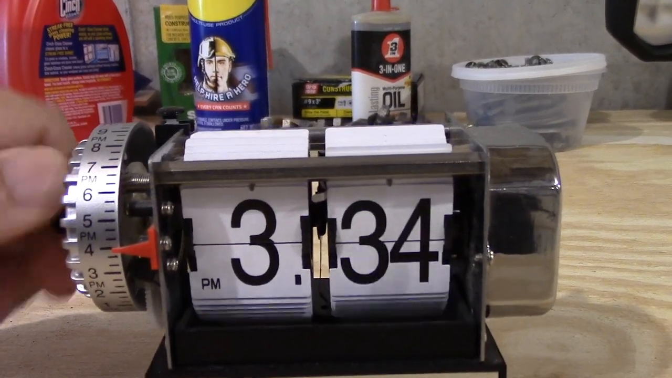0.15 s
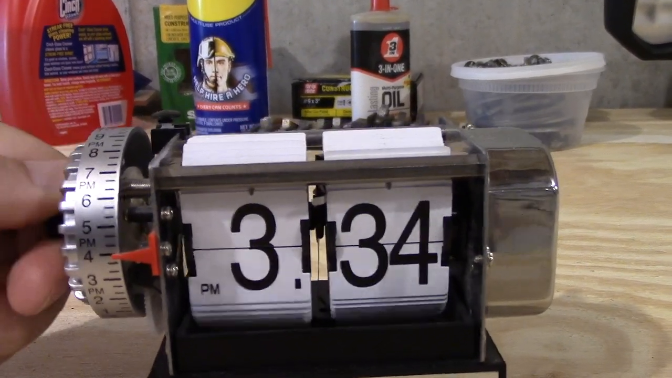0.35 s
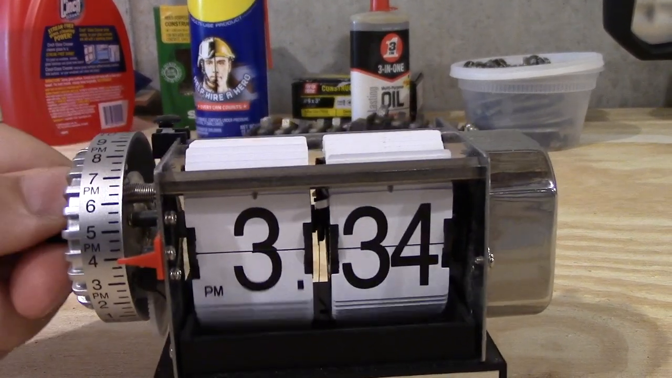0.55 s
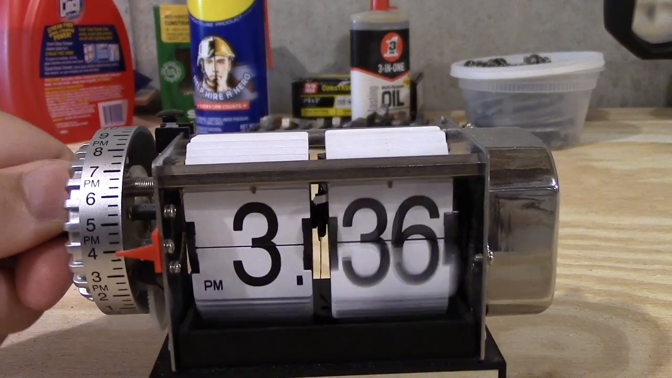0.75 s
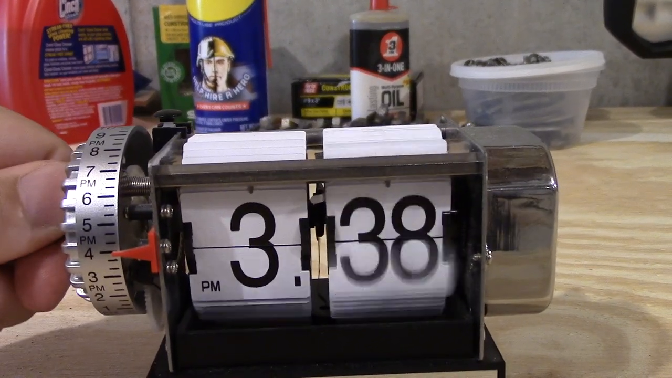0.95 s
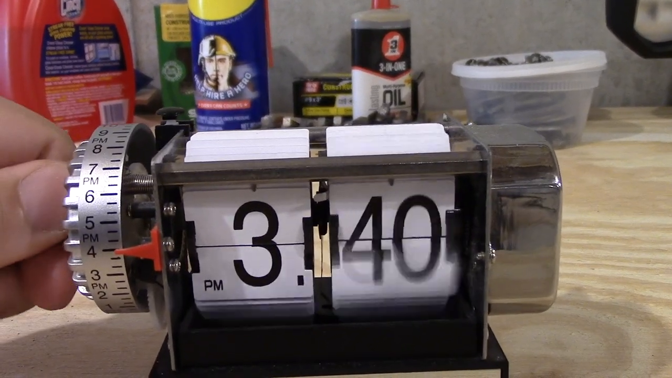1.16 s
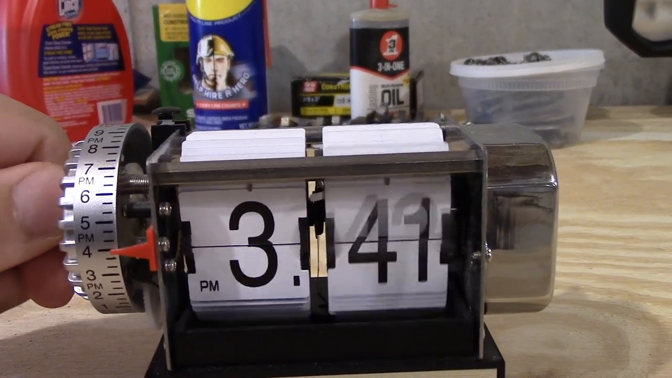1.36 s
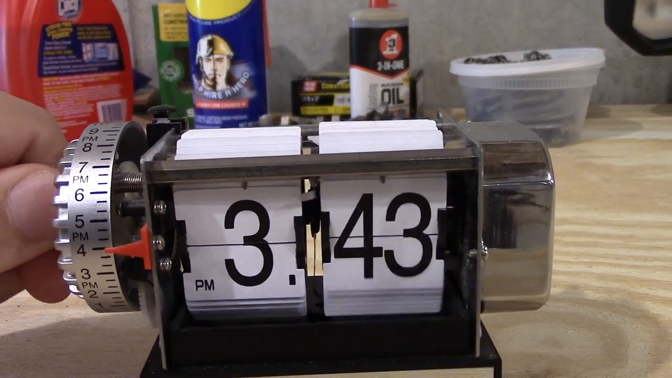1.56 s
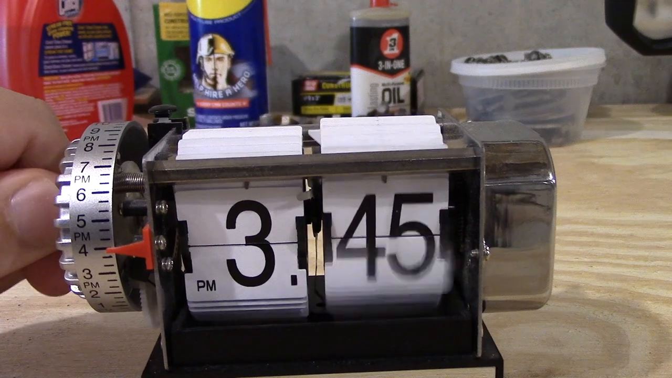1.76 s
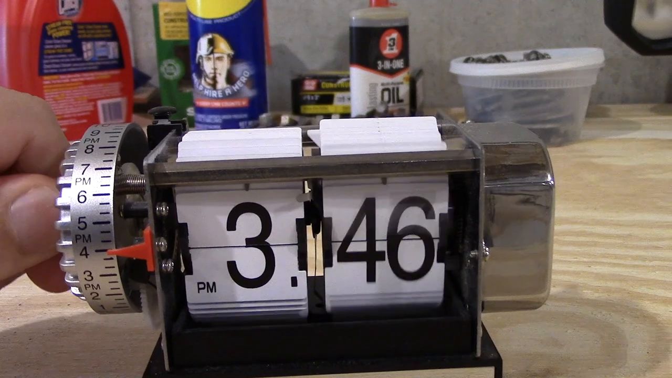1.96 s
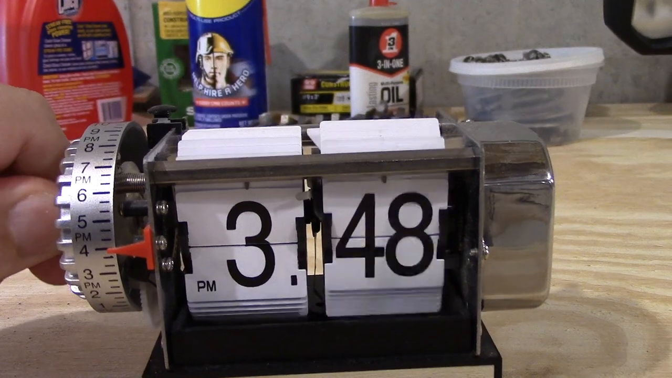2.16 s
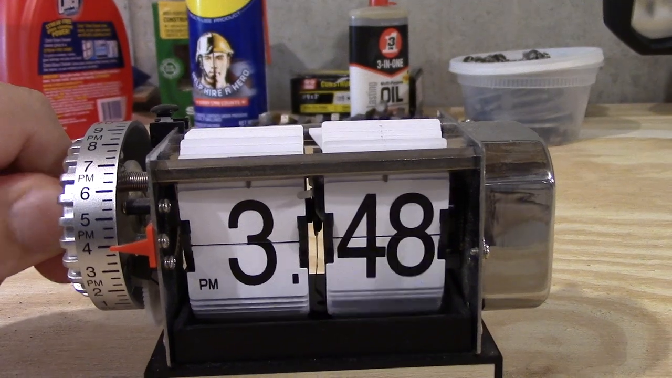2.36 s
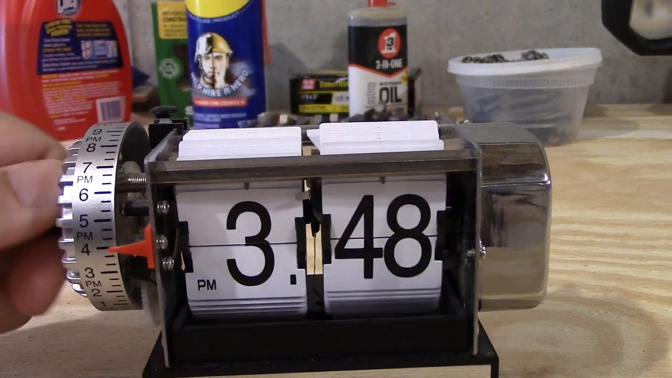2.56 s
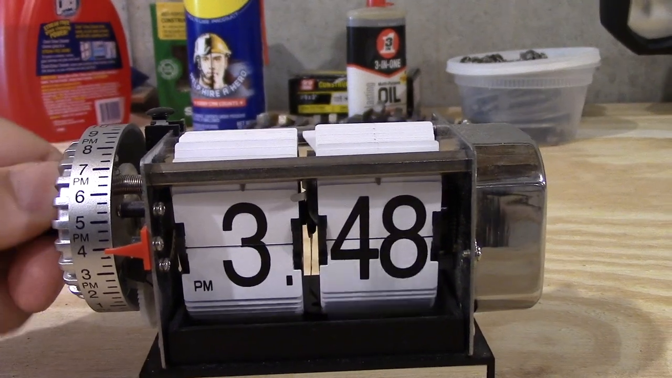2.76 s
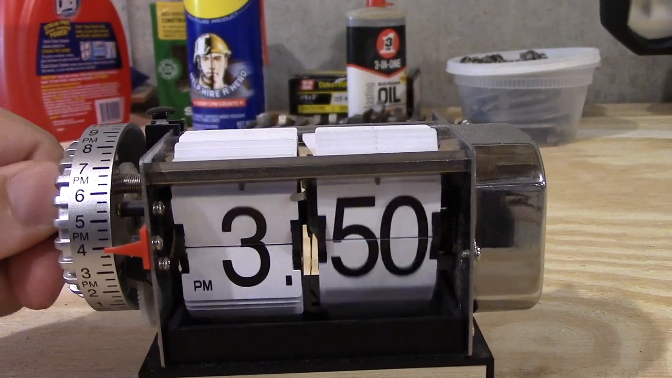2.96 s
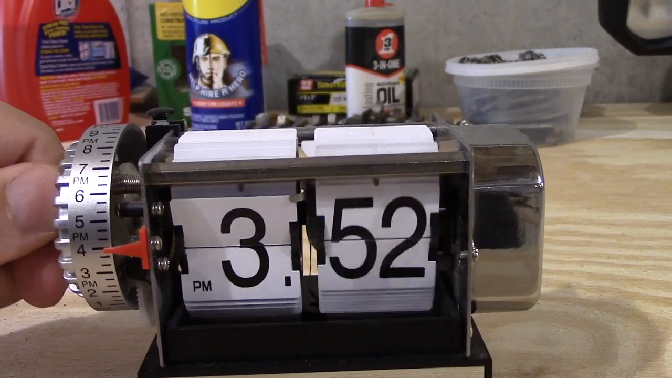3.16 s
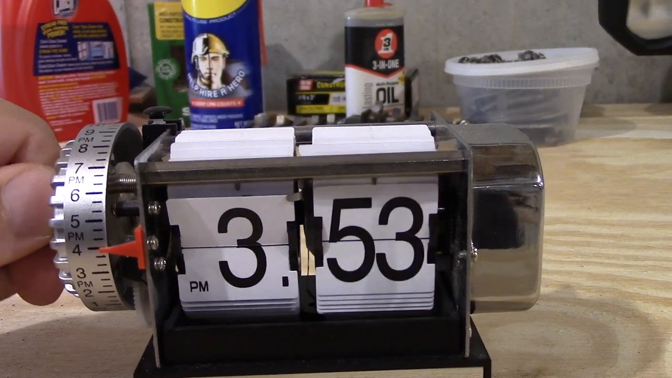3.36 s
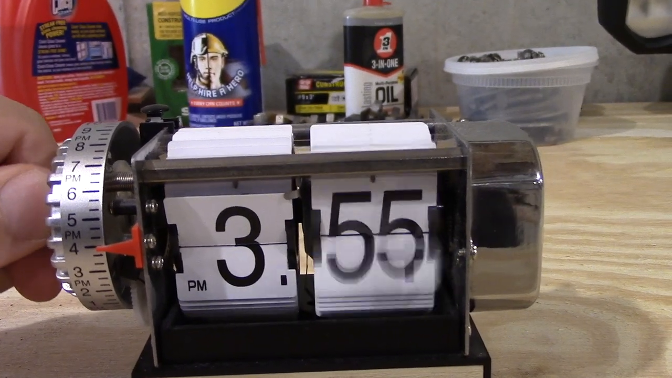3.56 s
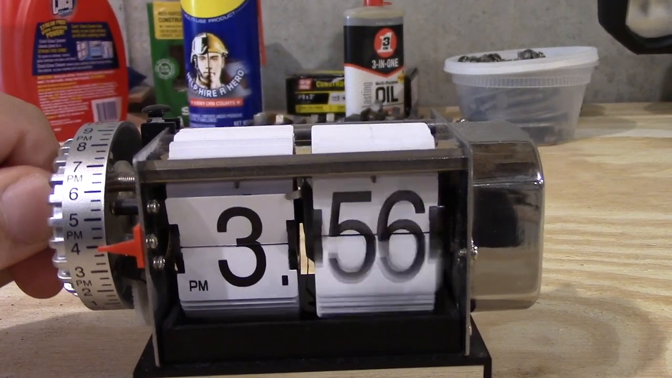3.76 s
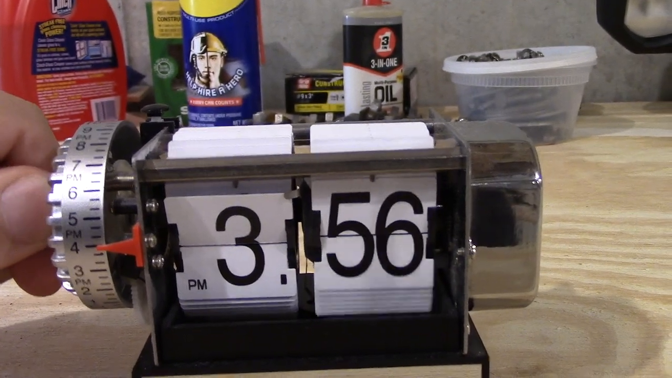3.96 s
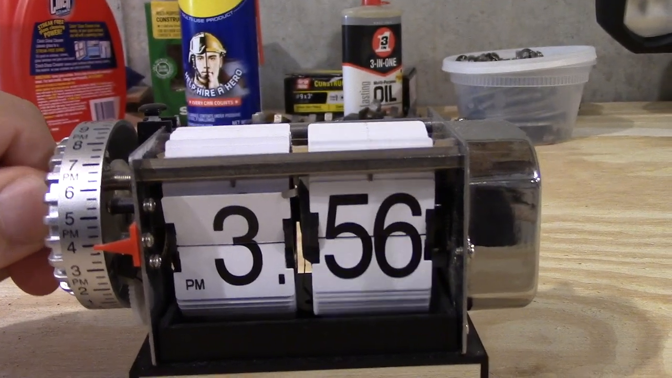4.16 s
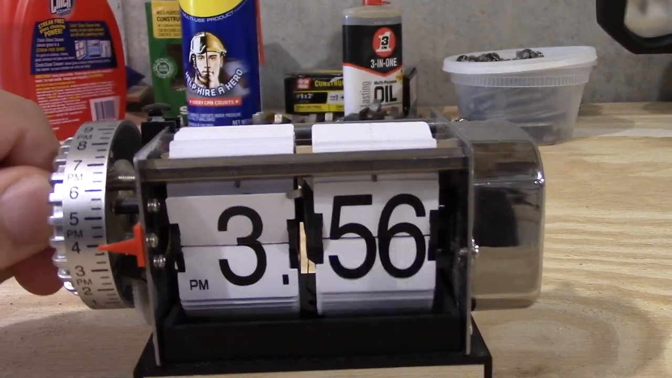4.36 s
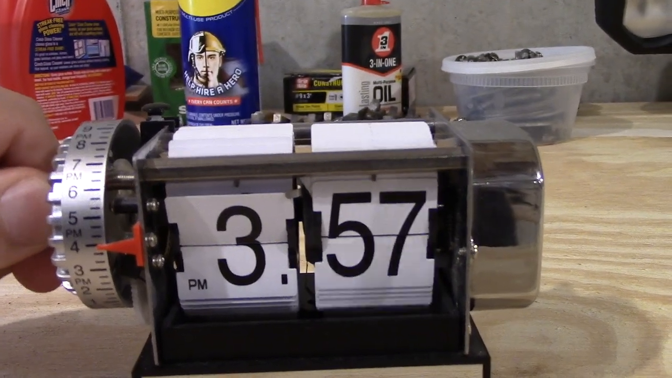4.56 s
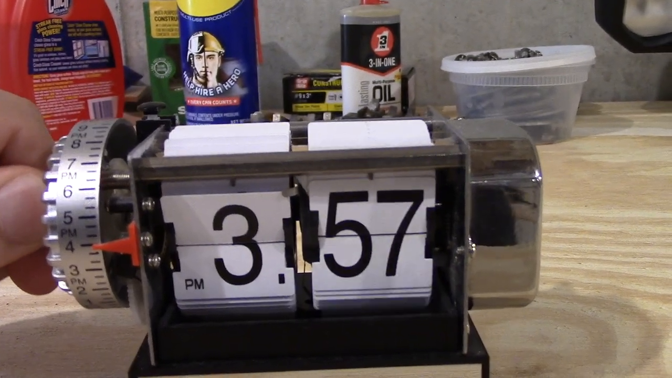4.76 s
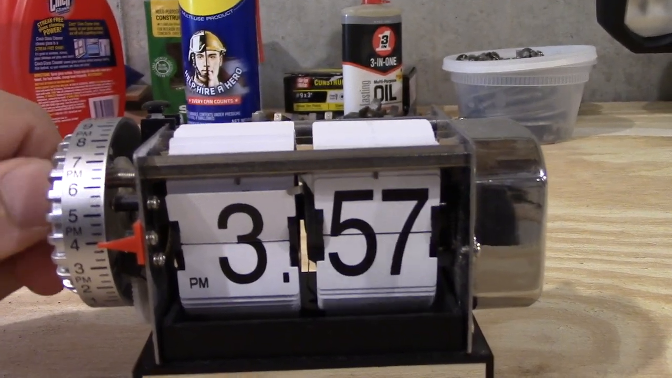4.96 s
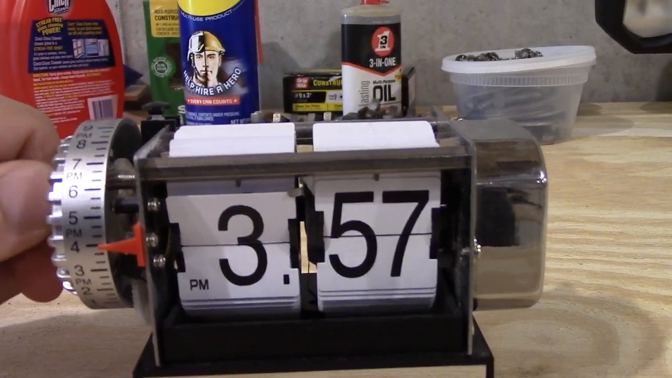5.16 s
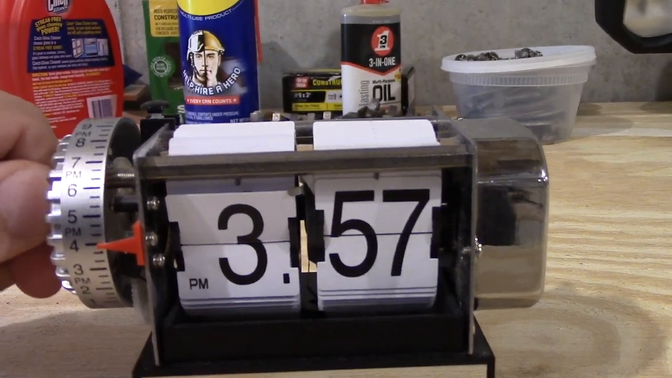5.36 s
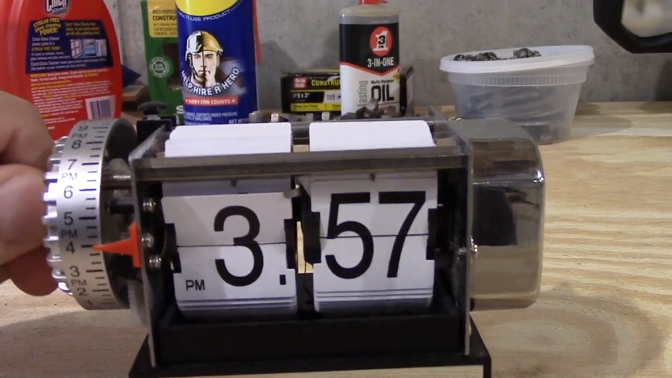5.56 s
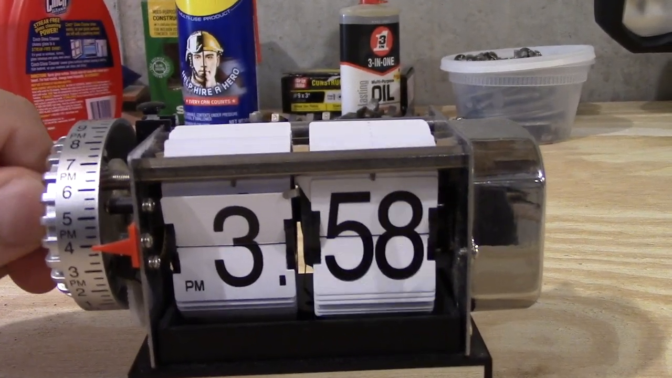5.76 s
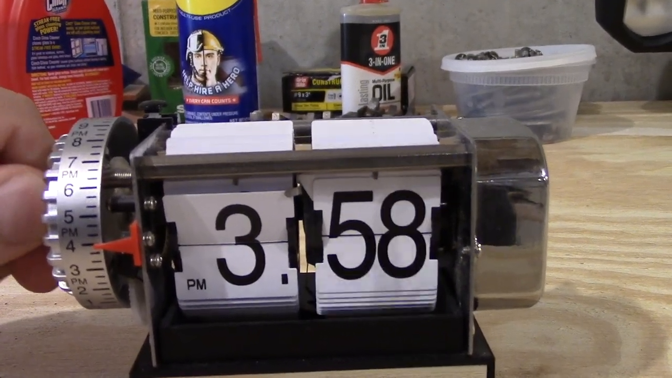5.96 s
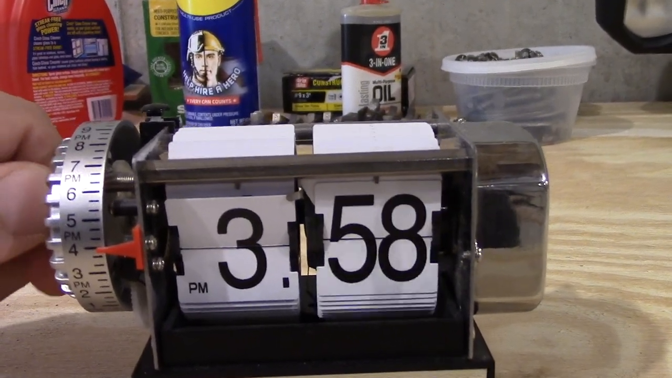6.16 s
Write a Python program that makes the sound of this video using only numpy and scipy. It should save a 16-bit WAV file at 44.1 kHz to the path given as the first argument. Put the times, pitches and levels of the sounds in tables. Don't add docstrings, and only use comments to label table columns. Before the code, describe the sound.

Loud plastic flip-clock tiles snap and slap down in two rapid runs with ratchety metallic clicking, slowing to single late slaps over quiet workshop hum.

```python
import sys
import numpy as np
from scipy import signal
from scipy.fft import rfft, irfft, next_fast_len
from scipy.io import wavfile
from scipy.ndimage import uniform_filter1d

SR = 44100
rng = np.random.default_rng(int(sys.argv[2]) if len(sys.argv) > 2 else 0)


def gain_from_db(level_db):
    decades = np.asarray(level_db, float) / 20
    return 10 ** decades


def generate_wav(signal):
    frames = np.transpose(np.atleast_2d(signal))
    scaled = np.clip(frames, -1, 1) * 32767
    pcm = np.round(scaled).astype(np.int16)
    wavfile.write(sys.argv[1], SR, pcm)


N = 274302
SPAN = 4096

# start in seconds, peak in dB, brightness in dB.
SLAPS = [(0.6841, -5, -4.5), (0.798, -6, -1), (0.9112, -5.5, 5.5), (1.0101, -5.5, 6.5), (1.1147, -5.5, 1.5),
         (1.1959, -5, 4), (1.3089, -7, 1), (1.45, -6, 6.5), (1.5888, -8, 0), (1.7046, -4, 8),
         (1.7813, -4.5, 4.5), (1.9009, -5, -3.5), (2.017, -4, 2.5), (2.1769, -5.5, -4.5), (2.9038, -8, 4.5),
         (2.9637, -5.5, 4), (3.0421, -5.5, 4), (3.1651, -4.5, 13), (3.306, -6, 4), (3.449, -5, 6.5),
         (3.632, -5.5, 0.5), (4.0131, -4.5, 8), (4.5253, -7, -0.5), (5.7785, -6.5, 1)]
# start in seconds, peak in dB, length in ms.
DRAGS = [(.6408, -11, 12), (.7553, -21.5, 7.9), (.7603, -14.5, 4.6), (.8655, -32.5, 1.6), (.869, -9, 3.1),
         (.9491, -14.5, 3.4), (1.0718, -28, 3.1), (1.1536, -15, 4.5), (1.1569, -14, 2.7),
         (1.2364, -30, 2.4), (1.2407, -17.5, 8.8), (1.2479, -23, 3.7), (1.3746, -14.5, 4.5),
         (1.7453, -30, 5.7), (1.7505, -30.5, 2.2), (1.8351, -41, 6.1), (1.8433, -22.5, 8.4),
         (1.849, -14, 5.5), (1.9835, -18.5, 15), (2.1047, -21, 5.5), (2.1107, -20, 4), (2.8767, -27.5, 3.5),
         (2.8792, -12, 3.6), (2.9545, -15, 3.1), (5.6093, -41, 5.2), (5.6142, -13.5, 5)]
# start in seconds, peak in dB, pawl against spring in dB.
DROPS = [(.6448, -17, 19.5), (.764, -17.5, 3), (.8733, -16, 10), (.9526, -14.5, 18.5), (1.0753, -9, 17.5),
         (1.3806, -14, 16), (1.5378, -16.5, 5.5), (1.54, -24, 10), (1.672, -21, -5.5), (1.755, -12.5, 18.5),
         (1.9892, -11, 21.5), (2.1259, -16, 3.5), (2.9376, -12.5, 9), (2.9405, -17.5, 7),
         (2.9573, -14.5, -4), (3.0074, -17.5, 15), (3.0097, -21, 5), (3.1294, -21.5, -3),
         (3.1321, -23, 7.5), (3.2182, -13, 14), (3.3995, -25, -0.5), (3.4023, -21, 4.5), (3.5612, -27, -11),
         (3.5649, -20, 4.5), (3.7644, -25.5, -4), (3.7687, -33.5, -7), (4.4561, -12.5, 4),
         (4.4611, -19.5, 17), (1.7585, -17.5, 11), (5.6207, -19, 0)]
# start in seconds, peak in dB.
TWANGS = [(1.5138, -28), (1.6483, -26), (1.9675, -32), (2.9259, -27), (2.9311, -26), (2.9944, -25),
          (3.1022, -23.5), (3.2022, -24), (3.3786, -21), (3.5432, -23.5), (3.7507, -19.5), (4.4511, -23.5),
          (4.4531, -29)]
# start in seconds, peak in dB.
FLICKS = [(.6785, -21), (.7952, -23.5), (.9062, -33.5), (.9898, -34), (1.108, -21), (1.2778, -31.5),
          (1.2831, -26.5), (1.4183, -23.5), (1.4415, -47), (1.5435, -29), (1.5684, -17), (1.6755, -23.5),
          (1.8835, -17), (2.1578, -17), (2.9139, -13), (3.1518, -36), (3.2541, -33.5), (3.4344, -38.5),
          (3.4392, -34.5), (3.5966, -18.5), (3.7971, -23), (4.4888, -28), (5.6499, -27)]
# start in seconds, peak in dB.
GEARS = [(.331, -58), (.6338, -52), (1.5555, -37.5), (1.6904, -44.5), (1.6979, -43.5), (1.8605, -36.5),
         (2.1214, -34), (2.1466, -34), (2.8929, -37.5), (3.0019, -34.5), (3.2391, -59), (3.4165, -29),
         (3.4232, -45.5), (3.5841, -44.5), (3.6076, -39), (3.7866, -37), (3.8121, -44), (4.4826, -44.5),
         (4.497, -33.5), (3.6185, -41), (4.8101, -50.5), (5.4613, -47.5), (5.4701, -61), (5.6449, -37),
         (5.6581, -36.5)]
# frame knock in dB relative to the peak for a contact of REFERENCE_DB, pawl
# against spring in dB, length in ms, crack in dB relative to the peak.
DRAG_TRAITS = (-13.5, 5, None, -20.5)
DROP_TRAITS = (-9.5, None, 2.2, -6)
TWANG_TRAITS = (-15, -12.5, 3, -10.5)
FLICK_TRAITS = (-7.5, -4.5, 3, 1.5)
GEAR_TRAITS = (-13, -8, 5.5, -5)
# start in seconds, peak in dB, length in ms, brightness in dB.
RUBS = [
    (0.091, -48, 22, 14),
    (.252, -38.5, 27, -8),
    (.268, -39.5, 19, 1),
    (.29, -51, 34, 17),
    (.372, -49.5, 72, 4),
    (.433, -35, 4.8, -2.5),
    (2.341, -56, 9.7, 16),
    (2.439, -58, 107, 11),
    (4.74, -49, 12, -7),
]
# start in seconds, peak in dB.
CREAKS = [
    (0.34, -49),
    (4.806, -41),
]
# start in seconds, peak in dB.
BUMPS = [
    (2.315, -47),
    (2.346, -41.5),
    (2.378, -48),
    (2.413, -51.5),
    (2.492, -48.5),
    (2.519, -43.5),
    (6.195, -40.5),
    (6.213, -46.5),
]

# centre in Hz, width in Hz, level in dB.
TILE_MODES = [(2570, 87, -19.5), (3470, 90, -15), (4493, 480, -18), (5450, 1200, -20.5), (6244, 170, 2),
              (6640, 680, -8.5), (8300, 550, -10.5), (9900, 170, -9), (10360, 320, -1), (11230, 260, -1),
              (13340, 400, -9.5), (13860, 2400, -10), (14820, 300, -9)]
# centre in Hz, width in Hz, level in dB.
SPRING_MODES = [(1104, 40, -7.5), (5930, 49, -2.5), (3600, 190, -7), (4654, 130, -9.5), (5840, 130, 2),
                (6540, 340, -2), (12500, 200, -11), (11460, 300, -9.5)]
# centre in Hz, width in Hz, level in dB.
PAWL_MODES = [(7700, 280, -9), (8560, 160, 2), (9260, 730, -4), (10200, 250, -6), (12450, 200, -6),
              (14800, 300, -16)]
# centre in Hz, width in Hz, level in dB.
FRAME_MODES = [(687, 130, -14.5), (965, 300, -6), (1300, 420, -13.5), (1769, 135, 0.5), (2206, 220, -5.5),
               (2573, 600, -4.5)]
# centre in Hz, width in Hz, level in dB.
DIAL_MODES = [(680, 94, 1.5), (2280, 120, 3), (2930, 160, -7.5), (3550, 170, -3.5), (5524, 200, -11),
              (6830, 250, -6.5), (8640, 150, -16), (12410, 500, -21)]
# centre in Hz, width in Hz, level in dB.
SHAFT_MODES = [(1930, 90, 3), (2340, 200, -16)]
# centre in Hz, width in Hz, level in dB.
BENCH_MODES = [(85.2, 35, 3.5), (187, 30, 10), (461, 140, -9.5), (906, 270, -19)]
# frequency in Hz, level in dB.
CRACK = [(500, -21), (2000, -10), (5000, 1), (10000, -2), (15000, -9.5), (20000, -29.5)]
# frequency in Hz, level in dB.
KNOCK = [(100, -22.5), (300, -7), (800, -16.5), (2500, -19.5), (5000, -25.5), (10000, -58)]

# frequency in Hz, level in dB under the centre.
WIDTH = [(500, -12), (2000, -27.5), (6000, -14), (8500, -17), (11000, -11), (14000, -9.5)]
# frequency in Hz, left's lead in radians.
PORTS = [(0, 0), (9300, -0.0), (11400, 0.1), (12000, 2.3), (12500, -0.0), (16400, -0.9)]
# frequency in Hz, left over right in dB.
LEAN = [(60, 3), (180, -2.5), (550, 0), (1650, 0.0), (4970, 0.0), (15000, -0.5)]
# frequency in Hz, time to fall 60 dB in seconds.
SHOP_DECAY = [(500, .3), (3000, 0.3), (8000, .2), (15000, .15)]
# time in seconds, level in dB.
ROOM_LEVEL = [(0.0, -47.5), (0.7, -48.5), (2.2, -50), (3.1, -49), (3.801, -50), (5.4, -51.5), (6.22, -51)]
# frequency in Hz, density in dB per Hz.
HUM = [(15, -50.5), (25, -19.5), (166, -5.5), (219, -8.5), (262, -5), (339, -11.5), (405, -8.5), (454, -14),
       (543, -13), (598, -15), (827, -19.5), (868, -22.5), (1200, -20.5), (1560, -49.5), (2640, -120)]
# frequency in Hz, density in dB per Hz.
AIR = [(530, -22), (900, -4), (933, -2), (1150, -16), (1430, -3.5), (2330, -5.5), (2590, 0), (2900, -8.5),
       (3150, -2.5), (3970, -8.5), (5390, -6.5), (7120, -12.5), (14600, -23), (15700, -30.5),
       (16500, -46.5)]
# centre in Hz, width in Hz, level in dB over the background.
DRONES = [(120, 12, 5), (160, 8, 8), (265, 20, 4), (2200, 60, 2.5), (2570, 130, 3)]

STACK_S, CASE_S = 0.029, 0.11
TILE_SCATTER_DB, METAL_SCATTER_DB = 1.5, 2.5
SLAP_KNOCK_DB = -27.5
SNAP_S, SCRAPE_S = 0.0007, 0.0007
REFERENCE_DB = -21
KNOCK_LAGS = 0.66
WALLS_DB = -32
AIR_DB, AIR_FOLLOWS = -57.5, 0.83
TOP_HZ = 15800


def unit(x):
    return x / np.sqrt(np.mean(x ** 2) + 1e-20)


def along(points, hz):
    f, v = np.transpose(points)
    return np.interp(np.log(hz + 1), np.log(f + 1), v)


def filtered(x, response):
    m = next_fast_len(N + 8192)
    spectrum = rfft(x, m) * response(np.fft.rfftfreq(m, 1 / SR))
    return irfft(spectrum, m)[..., :N]


def contact(length_s, rise_s, grit_db):
    t = np.arange(SPAN) / SR
    swell = 1 - np.exp(-(t / np.reshape(rise_s, (-1, 1))) ** 2)
    release = np.exp(-(t / length_s[:, None]) ** 2)
    noise = rng.standard_normal((2, len(length_s), SPAN))
    grit = gain_from_db(grit_db * rng.standard_normal(noise.shape[1:]))
    return rfft(swell * release * noise * grit)


def body(modes, count, scatter_db):
    f = np.fft.rfftfreq(SPAN, 1 / SR)
    hz, width, db = np.transpose(modes)[:, :, None]
    sign = (-1.) ** np.arange(len(modes))[:, None]
    damping = 1j * f * width
    shapes = sign * gain_from_db(db) * damping / (hz ** 2 - f ** 2 + damping)
    strengths = gain_from_db(scatter_db * rng.standard_normal((count, len(modes))))
    return strengths @ shapes


def struck(force, response, peak_db):
    fade = np.clip(np.linspace(8, 0, SPAN), 0, 1)
    rows = irfft(force * response, SPAN) * fade
    top = np.sqrt(2 * uniform_filter1d(rows ** 2, size=50).max(-1, keepdims=True))
    return rows / top * gain_from_db(peak_db)[:, None]


def placed(times, rows):
    out = np.zeros((2, N + SPAN))
    for s, row in zip(times, rows.transpose(1, 0, 2)):
        start = round(s * SR)
        out[:, start:start + SPAN] += row
    return out[:, :N]


def rattle(count, near_s, far_s, far_db, gappy_db):
    t = np.arange(SPAN) / SR
    decay = gain_from_db(-60 * t / near_s) + gain_from_db(far_db - 60 * t / far_s)
    shape = (1 - np.exp(-t / 0.0008)) * decay
    gaps = unit(uniform_filter1d(rng.standard_normal((count, SPAN)), size=90))
    return rfft(shape * gain_from_db(gappy_db * gaps) * rng.standard_normal((2, count, SPAN)))


def tiles():
    s, db, bright_db = np.transpose(SLAPS)
    f = np.fft.rfftfreq(SPAN, 1 / SR)
    force = contact(np.full(len(s), .0011), rise_s=0.00055, grit_db=4.5)
    force = force + [[[1.7]], [[0]]] * force[:, :1]
    tilt = gain_from_db(np.outer(bright_db - 5, np.clip((f - 6500) / 3500, 0, 1)))
    ring = tilt * body(TILE_MODES, len(s), TILE_SCATTER_DB)
    frame = body(FRAME_MODES, count=len(s), scatter_db=-0.5) + gain_from_db(along(KNOCK, f) + 5.5)
    after = rattle(len(s), near_s=STACK_S, far_s=CASE_S, far_db=-19, gappy_db=0.0)
    stack = (0.21 * ring / tilt + gain_from_db(along(CRACK, f) - 5.5)) / (1 + (f / 9000) ** 2)
    rows = struck(force, ring, db + 2.0)
    rows = rows + struck(force, frame, db + SLAP_KNOCK_DB)
    rows = rows + struck(after, stack, db - 13.5)
    return placed(s - .0004, rows)


def contacts():
    kinds = [(DRAGS, DRAG_TRAITS), (DROPS, DROP_TRAITS), (TWANGS, TWANG_TRAITS),
             (FLICKS, FLICK_TRAITS), (GEARS, GEAR_TRAITS)]
    events = []
    for rows, traits in kinds:
        for row in rows:
            events.append(tuple(row[:2]) + tuple(row[-1] if v is None else v for v in traits))
    return np.transpose(events)


def ratchet():
    s, db, knock_db, pawl_db, ms, crack_db = contacts()
    knock_db = knock_db - KNOCK_LAGS * (db - REFERENCE_DB)
    f = np.fft.rfftfreq(SPAN, 1 / SR)
    crack = gain_from_db(along(CRACK, f))
    scrape = contact(ms * SCRAPE_S, rise_s=ms * SCRAPE_S / 3, grit_db=1.5)
    snap = contact(np.clip(ms - 1.5, .5, 20) * SNAP_S, rise_s=ms * SNAP_S / 4, grit_db=8.5)
    lean = gain_from_db(pawl_db / 2)[:, None]
    pawl = lean * body(PAWL_MODES, len(s), METAL_SCATTER_DB)
    spring = body(SPRING_MODES, len(s), METAL_SCATTER_DB) / lean
    frame = body(FRAME_MODES, count=len(s), scatter_db=METAL_SCATTER_DB) + gain_from_db(along(KNOCK, f))
    damping_db = 1.1 * np.clip(crack_db + 2.5, 0, 14)
    after = rattle(len(s), near_s=0.038, far_s=0.11, far_db=-15, gappy_db=0.0)
    rows = struck(scrape, pawl + spring, db - 2.0 - damping_db)
    rows = rows + struck(snap + 0.83 * scrape, frame, db + knock_db + 2.5)
    rows = rows + struck(snap, crack, db + np.minimum(crack_db, -1.5))
    rows = rows + struck(after, crack + 4.5 * frame, db - 15.0)
    return placed(s - .0003, rows)


def fingers():
    s, db, ms, bright_db = np.transpose(RUBS)
    f = np.fft.rfftfreq(SPAN, 1 / SR)
    force = contact(ms * .0008, rise_s=0.0052, grit_db=5.0)
    tilt = gain_from_db(np.outer(bright_db, np.clip((f - 3000) / 3000, 0, 1)))
    dial = body(DIAL_MODES, count=len(s), scatter_db=3.5) + gain_from_db(along(CRACK, f) - 19)
    return placed(s, struck(force, tilt * dial, db))


def knob():
    s, db = np.transpose(CREAKS)
    force = contact(np.full(len(s), .006), rise_s=0.0034, grit_db=-3)
    return placed(s, struck(force, body(SHAFT_MODES, count=len(s), scatter_db=-8.5), db))


def bench():
    s, db = np.transpose(BUMPS)
    force = contact(np.full(len(s), .002), rise_s=0.0034, grit_db=0.5)
    return placed(s, struck(force, body(BENCH_MODES, count=len(s), scatter_db=-2.0), db + 5.5))


def walls(x):
    hz, t, z = signal.stft(rng.standard_normal((2, SR // 3)), SR, nperseg=256)
    decay = gain_from_db(-60 * t / along(SHOP_DECAY, hz)[:, None])
    tail = signal.istft(z * decay, SR, nperseg=256)[1]
    tail = tail / np.linalg.norm(tail[0])
    delayed = np.pad(x, (200, 0))[None]
    return signal.fftconvolve(delayed, tail, axes=1)[:, :N]


def drone_boost(hz):
    return sum(db / (1 + (2 * (hz - c) / w) ** 2) for c, w, db in DRONES)


def rush(spectrum, patchy_db):
    z = signal.stft(rng.standard_normal((2, N + 1024)), nperseg=512)[2]
    field = uniform_filter1d(rng.standard_normal(z.shape[1:]), size=6, axis=0)
    field = uniform_filter1d(field, size=12, axis=1)
    pair = signal.istft(z * gain_from_db(patchy_db * unit(field)), nperseg=512)[1][:, :N]
    return unit(filtered(pair, lambda hz: gain_from_db(along(spectrum, hz) + drone_boost(hz))))


def workshop():
    level_db = np.interp(np.arange(N) / SR, *np.transpose(ROOM_LEVEL))
    air_db = AIR_DB + AIR_FOLLOWS * (level_db - level_db.mean())
    hum = gain_from_db(level_db) * rush(HUM, patchy_db=.6)
    air = gain_from_db(air_db) * rush(AIR, patchy_db=.4)
    return hum + 0.086 * hum[::-1] + air + 0.12 * air[::-1]


def port_gain(hz):
    return (gain_from_db(along(LEAN, hz)) * np.exp(1j * along(PORTS, hz))) ** [[.5], [-.5]]


def scene():
    centre, other = tiles() + ratchet() + fingers() + bench() + knob()
    side = filtered(other, lambda hz: gain_from_db(along(WIDTH, hz)))
    ports = filtered(centre, port_gain)
    return ports + [side, -side] + gain_from_db(WALLS_DB) * walls(centre) + workshop()


def roll_off(x):
    return signal.sosfilt(signal.butter(12, 16800, fs=SR, output="sos"), x)


def record(dry):
    push = filtered(dry ** 2, lambda hz: 1 / (1 + (hz / 300) ** 2))
    mic = dry - gain_from_db(-25.5) * push
    clipped = mic / (1 + np.abs(mic / 1.05) ** 8) ** (1 / 8)
    limited = filtered(clipped, lambda hz: 1 / (1 + (hz / TOP_HZ) ** 60))
    return roll_off(limited)


dry = scene()
out = record(dry)
generate_wav(out)
```